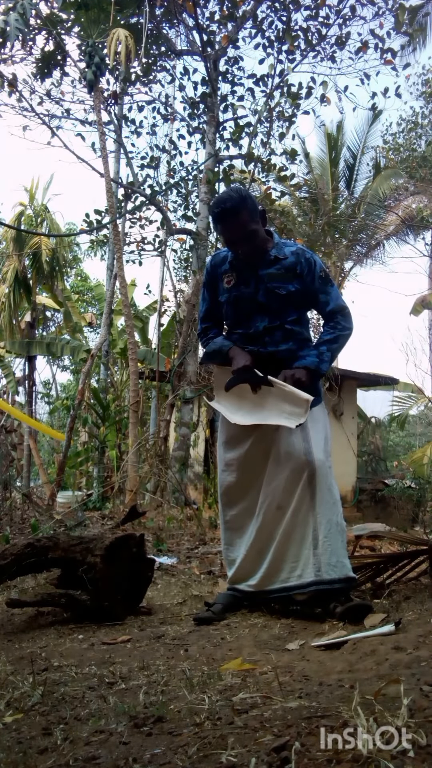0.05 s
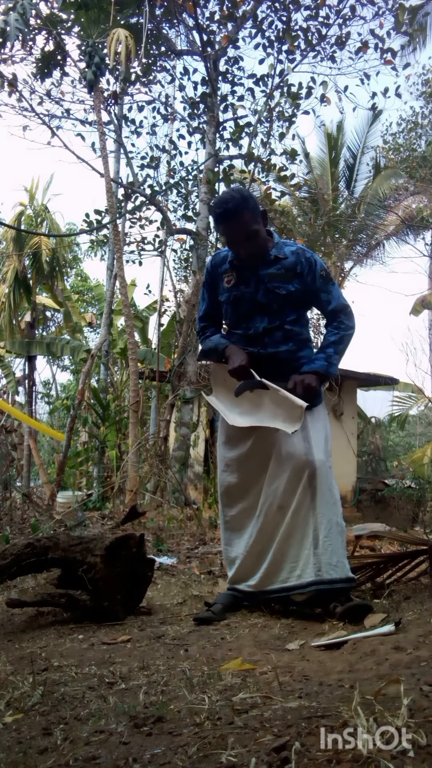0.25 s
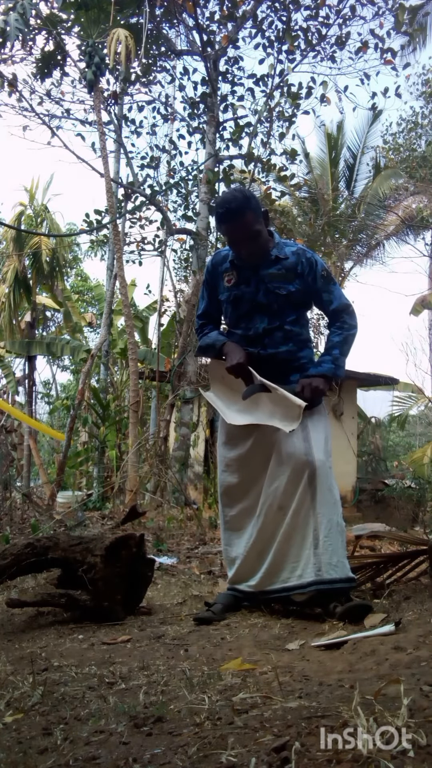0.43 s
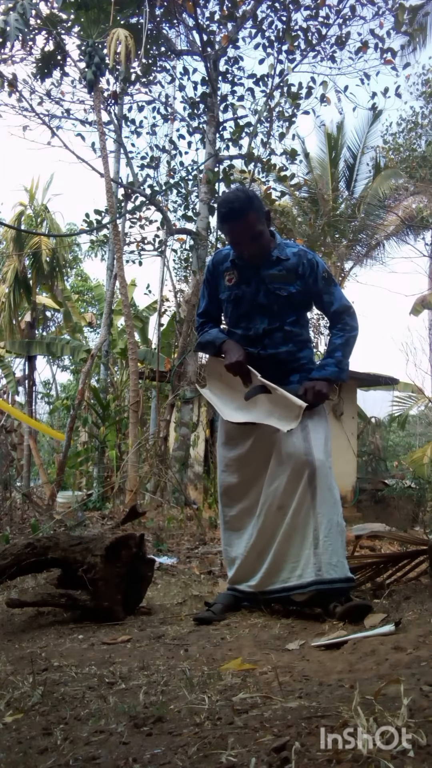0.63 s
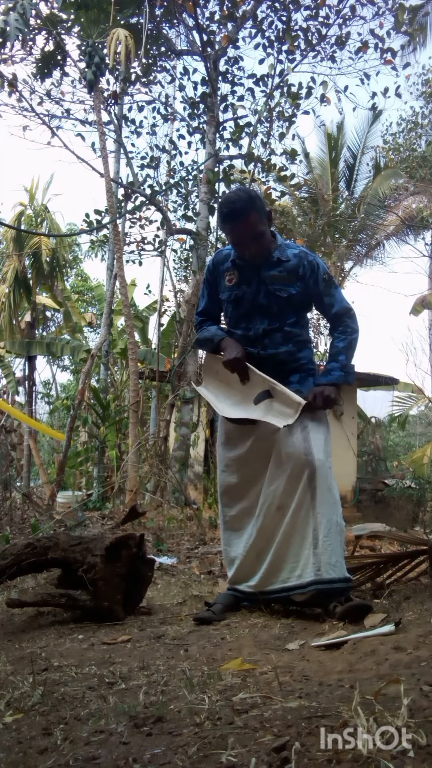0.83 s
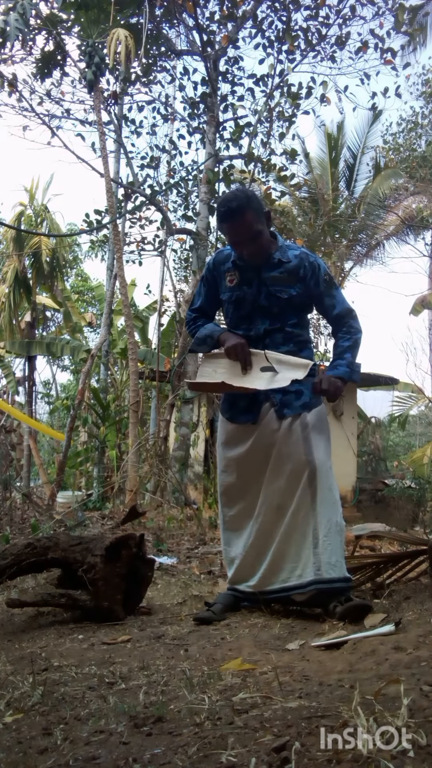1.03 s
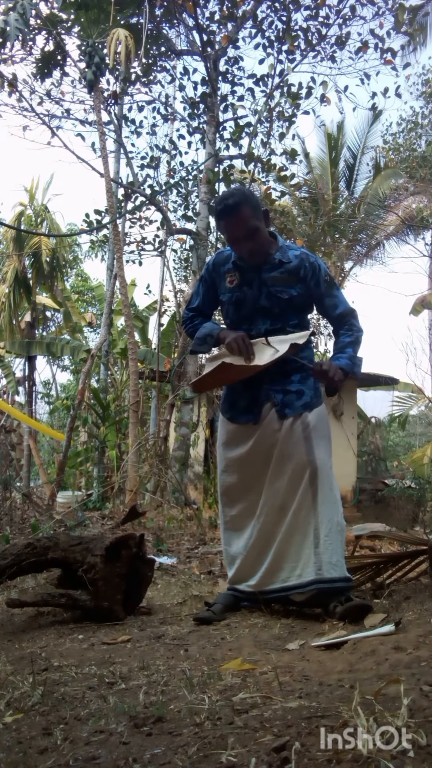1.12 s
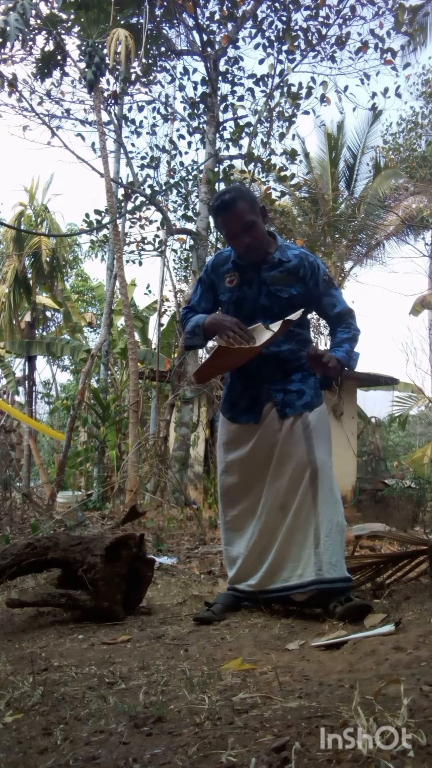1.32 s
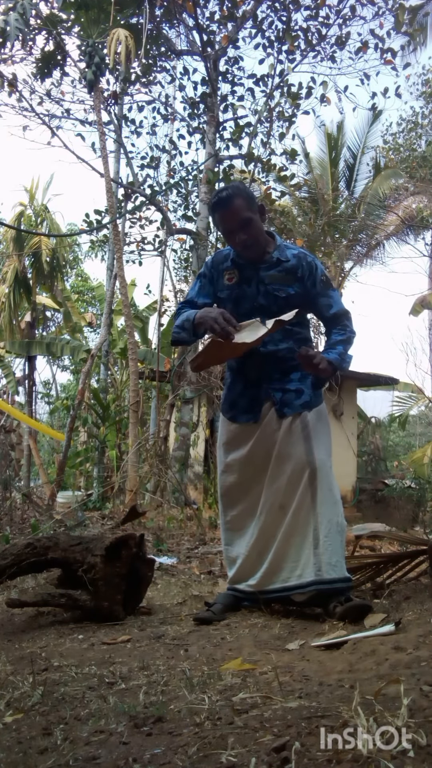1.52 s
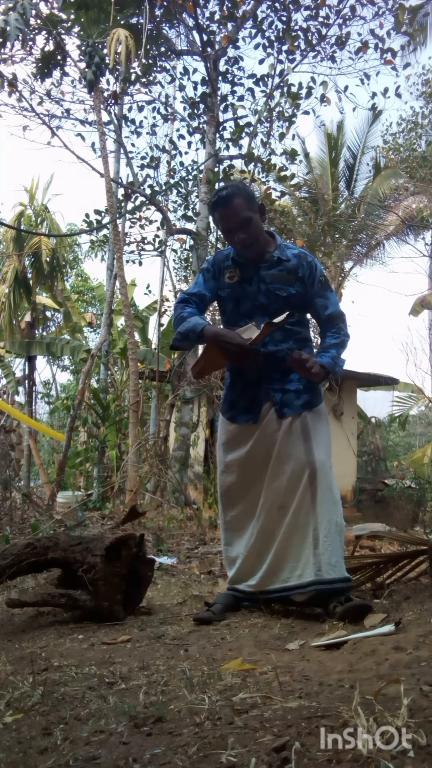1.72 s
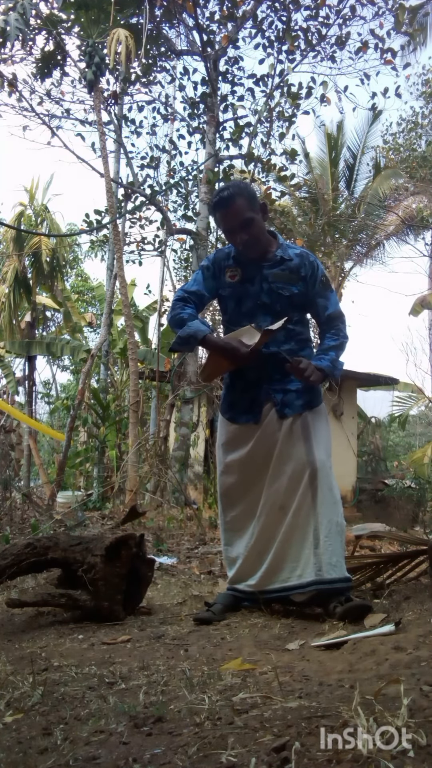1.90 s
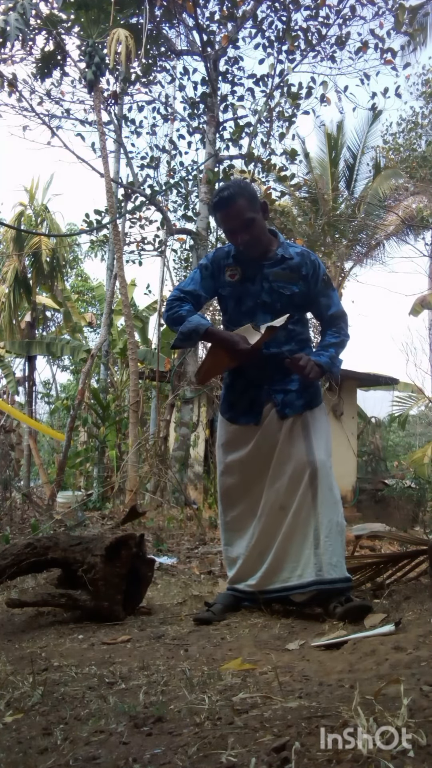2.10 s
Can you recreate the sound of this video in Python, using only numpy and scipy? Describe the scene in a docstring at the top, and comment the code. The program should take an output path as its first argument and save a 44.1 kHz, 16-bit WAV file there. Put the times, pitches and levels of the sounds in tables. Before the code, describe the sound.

Dry palm sheath scraped and cut with a blade, then knocked lightly, with faint birds behind.

```python
"""A blade scrapes twice over a stiff, dry palm sheath, catching small fibres that set it vibrating.
Then it cuts: thick fibres snap in a quick, uneven run, growing louder, until the cut runs through.
The sheath is turned over with a tick, a short stick-slip creak and a hollow knock.
Throughout, small birds call over the low rumble of a yard whose walls and trees answer faintly."""
import sys
import numpy as np
from scipy import signal
from scipy.fft import rfft, irfft, next_fast_len
from scipy.io import wavfile

SR = 44100
rng = np.random.default_rng(int(sys.argv[2]) if len(sys.argv) > 2 else 0)


def write(x):
    x = np.atleast_2d(x).T
    wavfile.write(sys.argv[1], SR, np.round(np.clip(x, -1, 1) * 32767).astype(np.int16))


N = 94815

# Thick fibres snapping. Each row: time in seconds, relative crack and plate levels in dB.
FIBRE_SNAPS = [(0.3421, -38, -35), (0.3626, -35, -33), (0.4494, -32, -35), (0.5072, -42, -47),
               (0.5975, -38, -38), (0.611, -38, -37), (0.6215, -37, -39), (0.6334, -37, -37),
               (0.6489, -33, -37), (0.6679, -35, -41), (0.6784, -34, -40), (0.7108, -33, -39),
               (0.7292, -37, -38), (0.7442, -28, -36), (0.7514, -33, -37), (0.7624, -34, -36),
               (0.7696, -30, -34), (0.7824, -33, -33), (0.7971, -27, -33), (0.8034, -35, -35),
               (0.8225, -32, -34), (0.8355, -26, -34), (0.845, -26, -33), (0.8504, -26, -29),
               (0.9064, -27, -28), (0.9174, -27, -30)]
# Blade strokes and rubs. Each row: start, hardest moment and end in seconds, plate level, rise and fall
# of force, crack and bending levels in relative dB, bending pitch factor, hiss level in relative dB,
# nominal catches per second.
BLADE_STROKES = [(0, 0.08, .16, -54.5, 1.5, -0.5, -69, -54.5, 1.114, -86, 900),
                 (0.154, 0.239, 0.33, -40, 9, 15.5, -50, -39, 0.895, -59.5, 1790),
                 (0.341, 0.42, 0.5, -35, 11, 19.5, -44.5, -33, 0.99, -54, 936),
                 (0.5, 0.525, 0.54, -48, 18, 19, -61.5, -51.5, 0.76, -84, 780),
                 (0.61, 0.653, 0.707, -44, 3.5, 7, -51.5, -44, 0.98, -65, 700),
                 (0.712, 0.738, 0.84, -39, 9.5, 5, -50.5, -45.5, 1.16, -76, 700),
                 (0.825, 0.877, .922, -27.5, 18, 6.5, -37.5, -33.5, 1.024, -50, 600),
                 (1.545, 1.553, 1.594, -54.5, 14, 4.5, -64, -48, 0.54, -85, 1140)]
# Spectra of the sheath's sounds. Each row: frequency in Hz, relative level in dB.
PLATE_SPECTRUM = [(200, -38.5), (500, -11.5), (680, -0.5), (780, 0.5), (1000, 0), (1270, 0.5),
                  (1450, -12.5), (1700, -20.5), (3000, -58.5)]  # the sheath as a stiff plate
BENDING_SPECTRUM = [(20, -80), (60, -32), (120, -11.5), (200, -8.5), (300, -10.5), (390, -1.5), (580, 2.5),
                    (750, -5), (1100, -35), (2500, -69)]  # its slow bending
CRACK_SPECTRUM = [(600, -18.5), (1700, -15.5), (2100, -4.5), (3300, -1.5), (3900, -2), (5000, 2),
                  (5800, -13), (6900, -12.5), (7800, -25.5), (8600, -31.5), (10200, -15.5), (14500, -44),
                  (16000, -42)]  # a fibre breaking
HISS_SPECTRUM = [(5000, -40), (6800, -8), (8500, -13), (9800, 0), (11200, 0), (12200, -5), (14500, -7),
                 (16000, -19)]  # the blade's edge
CREAK_SPECTRUM = [(20, -72), (150, -30.5), (400, -13.5), (600, -3.5), (830, 0.5), (1000, -11.5),
                  (1300, -21.5), (2000, -32), (5000, -49.5), (15000, -67)]
THUMP_SPECTRUM = [(20, -60), (50, -26), (120, -3), (220, -1), (420, 0), (900, -2), (1250, -4), (1600, -21),
                  (3000, -26), (7000, -48), (16000, -75)]
CLICK_SPECTRUM = [(600, -20), (1800, -7), (3200, -2), (4800, 0), (6000, -9), (7500, -9), (8700, -19),
                  (10200, -14), (13000, -21), (16000, -24), (22000, -45)]
# Natural frequencies of the sheath in Hz.
SHEATH_MODES_HZ = [395, 477, 585, 595, 773, 792, 976, 1050, 1173, 1334]
# Creaks of the bent sheath. Each row: peak time, rise and fall in seconds, level in dB,
# nominal slips per second, scuff level in dB.
CREAK_SWELLS = [(1.205, .008, 0.014, -55, 300, -79), (1.243, 0.019, 0.011, -41.5, 200, -70.5),
                (1.37, 0.038, 0.028, -64.5, 340, -84), (1.712, 0.0072, 0.018, -55, 237, -77)]
# Handling impacts. Each row: time in seconds, thump level in dB and pitch factor, the same for the click.
IMPACTS = [(0.0969, -18, 1.11, -31, 0.63), (0.0982, -21.5, 0.47, -49, 0.61), (0.1234, -27.5, 0.64, -37, .9),
           (0.129, -25.5, 0.53, -95, .7), (1.0625, -38.5, 1.94, -35.5, 0.92), (1.5444, -23.5, 0.88, -56, 1),
           (1.5485, -17.5, 0.61, -57.5, 0.93), (1.5549, -14.5, 1.08, -34.5, 0.52),
           (1.5571, -11.5, 1.015, -49, 0.55), (1.576, -23, 0.42, -54, 0.49), (1.59, -31, 0.48, -49, 0.62)]
# Decay of the yard's echo. Each row: frequency in Hz, reverberation time in seconds.
YARD_T60 = [(150, 0.34), (1000, 0.16), (4500, 0.33), (10000, 0.2)]
# Bird notes. Each row: start and length in seconds, top pitch and fall in Hz, level in dB.
BIRD_NOTES = [(.016, .014, 6500, 200, -65), (0.025, 0.035, 7120, 590, -62),
              (0.044, 0.055, 6420, 412, -66.5), (1.1, 0.041, 6500, 500, -71.5),
              (1.132, 0.017, 6140, 98.6, -65.5), (1.156, 0.015, 6530, 398, -72),
              (1.382, 0.027, 2360, 100, -64.5), (1.525, 0.022, 6400, 696, -78),
              (1.766, 0.11, 7160, 594, -76), (1.83, 0.083, 6530, 101, -75.5), (1.78, .12, 4750, 252, -73.5),
              (1.972, 0.049, 6260, 910, -63), (2.062, .036, 6490, 1840, -61)]
# A far bird: peak time and time spread in seconds, pitch and width in Hz, level in dB.
FAR_WHISTLE = (1.93, .07, 1930, 50, -71)
# Rumble of outdoor air. Each row: frequency in Hz, relative level in dB.
AIR_SPECTRUM = [(15, -36), (25, -34.5), (61, -3.5), (99, 3), (249, -6), (394, -7.5), (489, -12.5),
                (641, -11), (887, -18), (1330, -18), (2110, -25.5), (4740, -31), (8140, -46.5),
                (14000, -46), (16000, -43)]


def blade(snap_lag_s=.0013, hiss_growth=1.5):
    """Impulse excitation: caught and snapping fibres drive the sheath; grip shifts its bending pitch."""
    t = np.arange(N) / SR
    times, crack_db, plate_db = np.transpose(FIBRE_SNAPS)
    times = times + snap_lag_s
    crack = impulses(times, amp(crack_db + 8))
    hiss = impulses(times, amp(crack_db - 4))
    plate = impulses(times, amp(plate_db + 25))
    bending = coloured(impulses(times, amp(plate_db + 14)), BENDING_SPECTRUM)
    for (start, hardest, end, plate_db, rise_db, fall_db,
         crack_db, bending_db, pitch, hiss_db, rate) in BLADE_STROKES:
        force_db = np.interp(t, [start, hardest, end], [-rise_db, 0, -fall_db])
        catches = slips(rate, scatter=.3, spread_db=2.5) * rng.choice([-1, 1], N)
        catches *= (t > start) & (t < end)
        crack += amp(crack_db + force_db) * catches
        plate += amp(plate_db + force_db) * catches
        hiss += amp(hiss_db + hiss_growth * force_db) * catches  # swells faster than the force
        bending += coloured(amp(bending_db + force_db) * catches, BENDING_SPECTRUM, pitch)
    body = sheath_resonance(coloured(plate, PLATE_SPECTRUM) + bending)
    crackle = coloured(splintered(crack), CRACK_SPECTRUM) + coloured(splintered(hiss), HISS_SPECTRUM)
    return amp(-4) * (body + crackle)


def sheath_resonance(x, width_hz=30, mode_db=-7):
    """Modal resonance: each mode is a damped oscillator whose ringing adds to the direct sound."""
    def response(f):
        damping = 1j * f * width_hz
        return 1 + amp(mode_db) * sum(damping / (hz ** 2 - f ** 2 + damping) for hz in SHEATH_MODES_HZ)
    return filtered(x, response)


def splintered(pushes, t60_s=.0053, share=.26):
    """Brittle fracture: each push trails a spray of splinters whose power decays exponentially."""
    t = np.arange(SR // 20) / SR
    power = signal.fftconvolve(pushes ** 2, amp(-60 * t / t60_s) ** 2)[:N]
    return pushes + share * np.sqrt(np.abs(power)) * rng.standard_normal(N)


def creaks():
    """Stick-slip friction: the bent sheath slips in short swells and scuffs against the hand."""
    t = np.arange(N) / SR
    pushes, scuff = np.zeros(N), np.zeros(N)
    for peak, rise, fall, db, rate, scuff_db in CREAK_SWELLS:
        swell = np.exp(-.5 * ((t - peak) / np.where(t < peak, rise, fall)) ** 2)
        pushes += amp(db) * swell * slips(rate, scatter=.38, spread_db=1)
        scuff += amp(scuff_db) * swell
    return coloured(pushes, CREAK_SPECTRUM) + coloured(scuff * rng.standard_normal(N), CRACK_SPECTRUM)


def knocks():
    """Impact: a dull thump and a small click, both pitched by where the sheath is touched."""
    out = np.zeros(N)
    for time, thump_db, thump_pitch, click_db, click_pitch in IMPACTS:
        push = impulses(np.array([time]), np.ones(1))
        out += amp(thump_db) * coloured(push, THUMP_SPECTRUM, thump_pitch)
        out += amp(click_db) * coloured(splintered(push), CLICK_SPECTRUM, click_pitch)
    return out


def yard_echo(x, near_db=-7.5, near_t60_s=.044, tail_db=-14.5, delay_s=.003):
    """Reflection: quick echoes from ground and body, then a faint tail from walls and trees."""
    hz, frame_times, noise = signal.stft(rng.standard_normal(SR // 2), SR, nperseg=256)
    decay = amp(-60 * frame_times / along(YARD_T60, hz)[:, None])
    tail = signal.istft(noise * decay, SR, nperseg=256)[1]
    t = np.arange(len(tail)) / SR
    near = rng.standard_normal(len(t)) * amp(-60 * t / near_t60_s)
    echo = amp(tail_db) * tail / np.linalg.norm(tail) + amp(near_db) * near / np.linalg.norm(near)
    return signal.fftconvolve(x, np.pad(echo, (int(delay_s * SR), 0)))[:N]


def birds(crest=.22, rise_over_fall=.9):
    """Frequency modulation: each chirp is an arch of pitch; a far whistle is a narrow band of noise."""
    t = np.arange(N) / SR
    peak, spread, hz, width_hz, db = FAR_WHISTLE
    out = amp(db) * np.exp(-.5 * ((t - peak) / spread) ** 2) * noise_band(hz, width_hz)
    for start, length, top_hz, fall_hz, db in BIRD_NOTES:
        progress = np.clip((t - start) / length, 0, 1)
        sag_before = rise_over_fall * (1 - progress / crest) ** 2
        sag_after = np.abs((progress - crest) / (1 - crest)) ** 1.68
        pitch_hz = top_hz - fall_hz * np.where(progress < crest, sag_before, sag_after)
        out += amp(db) * np.sin(np.pi * progress) * np.sin(2 * np.pi * np.cumsum(pitch_hz) / SR)
    return out


def foliage(x, flutter_hz=90, flutter_share=.25, tail_db=-9, t60_s=.35):
    """Scattering: leaves make the birds' notes flutter and spread them into a diffuse tail."""
    t = np.arange(SR // 2) / SR
    tail = rng.standard_normal(len(t)) * amp(-60 * t / t60_s)
    x = x * (1 - flutter_share + flutter_share * noise_band(hz=0, width_hz=flutter_hz))
    return x + amp(tail_db) * signal.fftconvolve(x, tail / np.linalg.norm(tail))[:N]


def background(air_db=-59.5, drone_db=-67.5):
    """Ambient noise: the broadband rumble of outdoor air and a distant narrowband drone."""
    air = unit(coloured(rng.standard_normal(N), AIR_SPECTRUM))
    return amp(air_db) * air + amp(drone_db) * noise_band(hz=76, width_hz=7.4)


def amp(db):
    """Amplitude ratio of a level in decibels."""
    return 10 ** (np.asarray(db) / 20)


def unit(x):
    """Normalisation to rms 1."""
    return x / np.sqrt(np.mean(x ** 2) + 1e-20)


def along(points, hz):
    """Interpolation of (Hz, value) points on a logarithmic frequency axis."""
    f, values = np.transpose(points)
    return np.interp(np.log(hz + 1), np.log(f + 1), values)


def filtered(x, response):
    """Linear filtering: the spectrum of x times a frequency response."""
    size = 2 * next_fast_len(N)
    return irfft(rfft(x, size) * response(np.fft.rfftfreq(size, 1 / SR)), size)[:N]


def coloured(x, spectrum, pitch=1, size=8192):
    """Minimum-phase filtering at unit energy, with the spectrum's frequencies scaled by pitch."""
    gain = unit(amp(along(np.array(spectrum) * [pitch, 1], np.fft.rfftfreq(size, 1 / SR))))
    cepstrum = irfft(np.log(gain))
    cepstrum[1:size // 2] *= 2  # folding onto positive time makes the filter causal
    cepstrum[size // 2 + 1:] = 0
    return signal.oaconvolve(x, irfft(np.exp(rfft(cepstrum))))[:N]


def noise_band(hz, width_hz):
    """Narrowband noise of rms 1 with a Gaussian spectrum."""
    return unit(filtered(rng.standard_normal(N), lambda f: np.exp(-.5 * ((f - hz) / width_hz) ** 2)))


def impulses(times, sizes):
    """An impulse train: one push at each time."""
    return np.bincount(np.clip(np.round(times * SR), 0, N).astype(int), sizes, N + 1)[:N]


def slips(rate, scatter, spread_db):
    """Irregular friction: pushes of uneven size at log-normal intervals, scaled to rms 1."""
    gap_draws, size_draws = rng.standard_normal((8000, 2)).T
    times = np.cumsum(np.exp(scatter * gap_draws)) / rate
    return unit(impulses(times, amp(spread_db * np.clip(size_draws, -2, 2))))


def scene():
    """Superposition: the sheath, its echo, the birds and the background add in one channel."""
    sheath = blade() + creaks() + knocks()
    return (sheath + yard_echo(sheath) + foliage(birds()) + background())[None]


def record(dry):
    """Band limiting: an ideal low-pass filter removes the highest treble."""
    return np.array([filtered(x, lambda hz: hz < 15800) for x in dry])


dry = scene()
out = record(dry)
write(out)
```